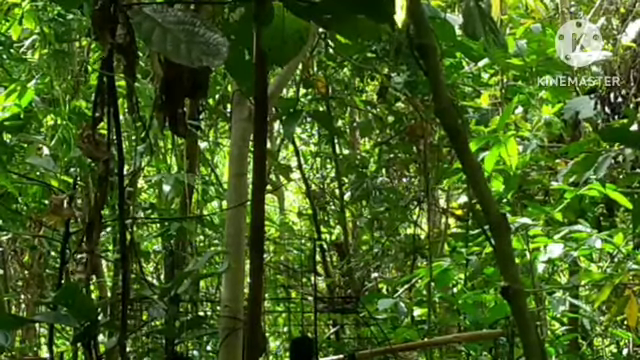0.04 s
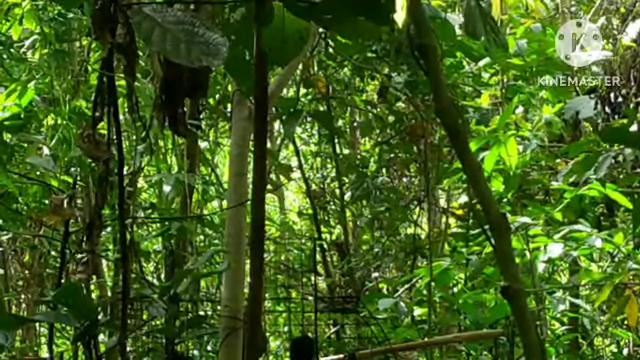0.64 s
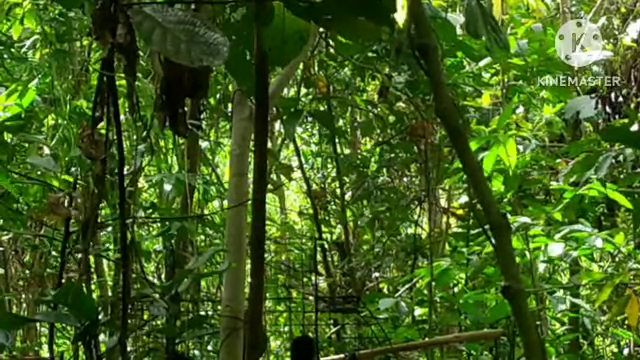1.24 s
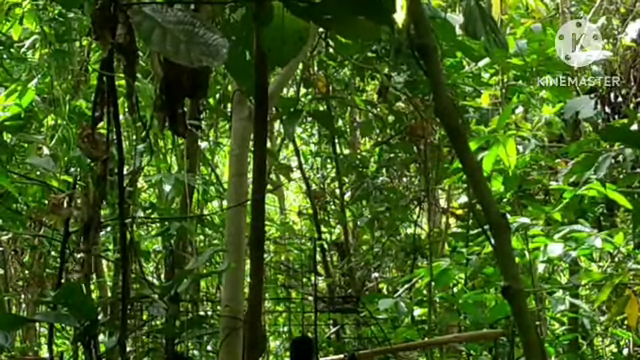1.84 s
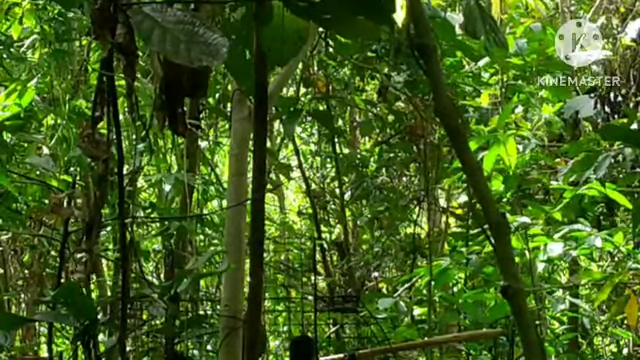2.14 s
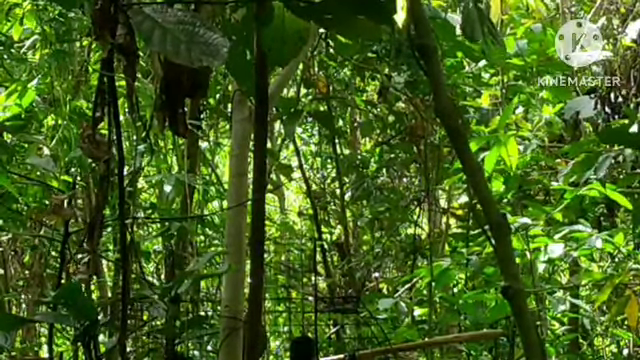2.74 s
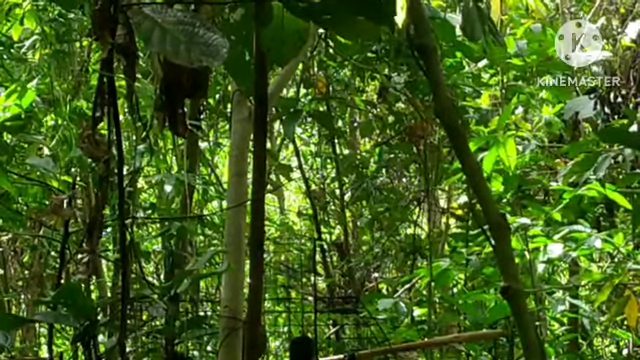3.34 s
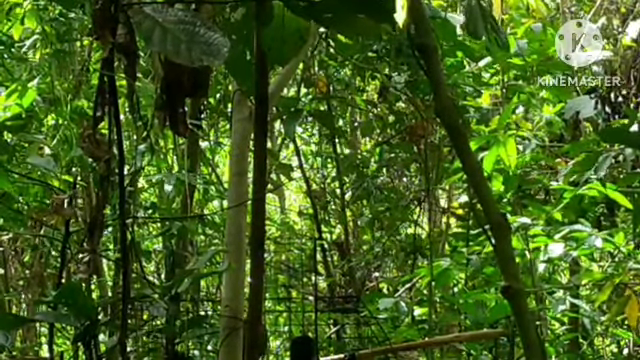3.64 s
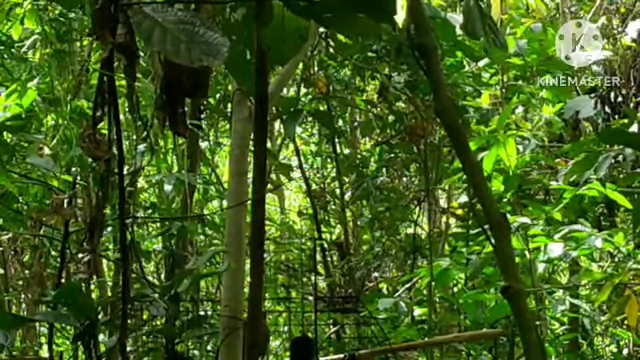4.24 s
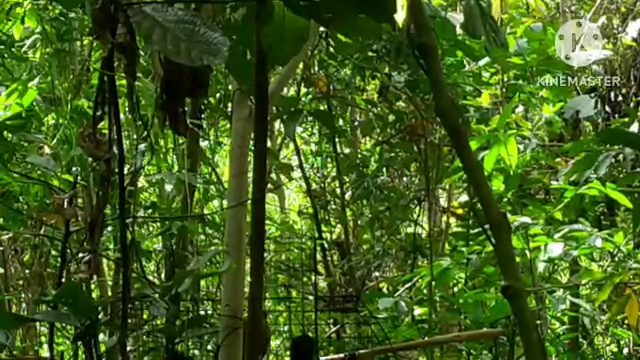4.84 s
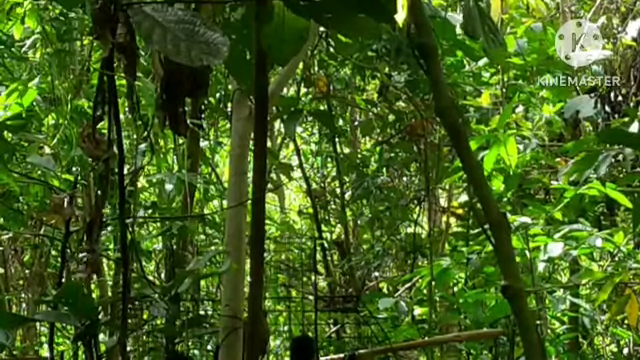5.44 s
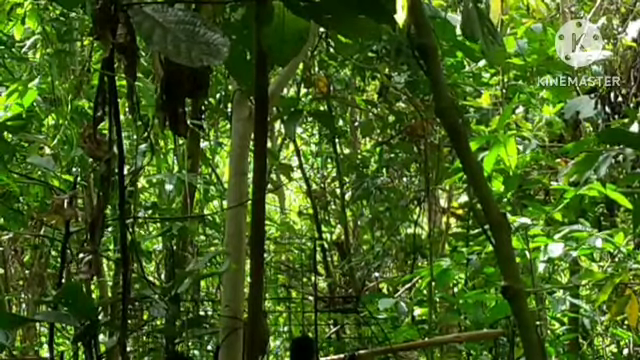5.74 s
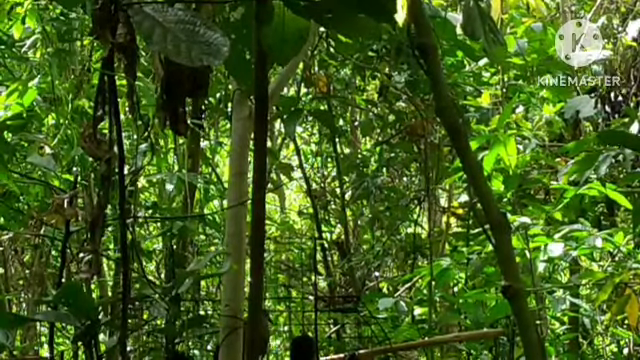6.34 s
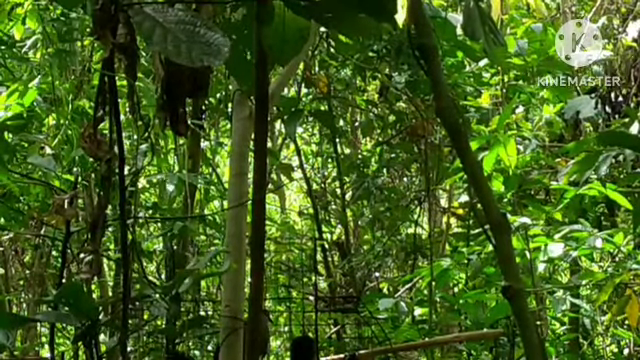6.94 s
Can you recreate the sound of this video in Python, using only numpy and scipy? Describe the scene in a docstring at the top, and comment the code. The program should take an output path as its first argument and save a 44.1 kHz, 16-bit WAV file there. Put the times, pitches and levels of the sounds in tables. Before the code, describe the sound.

A dove hoots in a quickening run in a forest while a small bird ticks sharply over faint insect hiss.

```python
"""A dense forest: a low rumble and a faint insect hiss go on throughout. First leaves rustle and a
far bird whistles. Then a dove starts a quickening run of upward-scooping hoots from its puffed-up
throat, and a small bird joins in on the left with sharp ticks. Faint whistles rise, the dove ends
with five soft hoots, and three hoarse chirps and a last high whistle follow.
Trunks and leaves scatter every call."""
import sys
import numpy as np
from scipy import signal
from scipy.fft import rfft, irfft, next_fast_len
from scipy.io import wavfile
from scipy.ndimage import uniform_filter1d, map_coordinates

SR = 44100
rng = np.random.default_rng(int(sys.argv[2]) if len(sys.argv) > 2 else 0)


def file_out(sig):
    """Save sig as 16-bit WAV at sys.argv[1]."""
    # one column per channel
    cols = np.atleast_2d(sig).T
    # limit, then scale
    lim = np.clip(cols, -1, 1)
    pcm = np.round(lim * 32767).astype(np.int16)
    wavfile.write(sys.argv[1], SR, pcm)


N = 307773


def amp(db):
    """Turn decibels into a number to multiply by."""
    return 10 ** (np.asarray(db) / 20)


def unit(x):
    """Scale a signal to an average strength (rms) of 1."""
    return x / np.sqrt(np.mean(x ** 2) + 1e-20)


def along(points, hz):
    """Read between the rows of a (frequency, value) table, on a log scale."""
    freqs, values = np.transpose(points)
    return np.interp(np.log(hz + 1), np.log(freqs + 1), values)


def wobble(rate, size):
    """A smooth curve through `rate` random values a second."""
    values = rng.standard_normal(int(size * rate / SR) + 4)
    return map_coordinates(values, [np.arange(size) * rate / SR])


def filtered(x, response):
    """Turn each frequency up or down by response(hz)."""
    size = next_fast_len(N + SR // 2)
    return irfft(rfft(x, size) * response(np.fft.rfftfreq(size, 1 / SR)), size)[..., :N]


def add(track, start, sound):
    """Mix a sound into a track, `start` seconds in."""
    part = track[..., max(round(start * SR), 0):][..., :sound.shape[-1]]
    part += sound[..., :part.shape[-1]]


def panned(sound, pan_db):
    """Make stereo, with the left pan_db louder than the right."""
    return sound * amp([[pan_db / 2], [-pan_db / 2]])


# How alike noise is in the two ears: f/Hz, likeness (1 = the same)
EAR_LIKENESS = [(50, 0.4), (150, 0.23), (500, 0.15), (2000, -0.015), (8000, -0.0038)]
def rush(spectrum, patchy_db):
    """Stereo noise with a given tone and random louder and quieter patches."""
    cells = signal.stft(rng.standard_normal((2, N)), nperseg=512)[2]
    patches = uniform_filter1d(rng.standard_normal(cells.shape[1:]), 5, 0)  # smooth over frequency
    patches = uniform_filter1d(patches, 14, 1)  # and over time
    noise = signal.istft(cells * amp(patchy_db * unit(patches)), nperseg=512)[1][:, :N]

    def response(hz):
        spread = np.arccos(np.clip(along(EAR_LIKENESS, hz), -1, 1)) / 2
        return amp(along(spectrum, hz)) * [np.cos(spread), np.sin(spread)]

    mid, side = filtered(noise, response)
    return unit(np.array([mid + side, mid - side]))


# Tone of the air: f/Hz, relative level/dB
AIR_TONE = [(20, -31), (30, -15), (40, -20), (54, 2.5), (70, -3.5), (110, -4), (160, -10), (260, -12.5),
            (500, -16), (800, -19.5), (1700, -21), (2600, -20), (4000, -25), (5200, -41), (8800, -120)]
def air():
    """The air rumbles, low and steady."""
    return panned(amp(-65.5) * rush(AIR_TONE, patchy_db=0.3), pan_db=-1.5)


# Tone of the insects: f/Hz, relative level/dB
INSECT_TONE = [(2350, -22), (4000, -10), (5600, -9.5), (6700, -3), (7400, -8), (8200, -2.5), (9500, -10),
               (12400, -12), (14500, -12.5), (15500, -15)]
# How loud they are: t/s, level/dB
INSECT_LOUDNESS = [(0, -64.5), (2.5, -65.5), (5.3, -62.5), (7, -63)]
def insects():
    """Insects blend into a faint, high hiss."""
    db = np.interp(np.arange(N) / SR, *np.transpose(INSECT_LOUDNESS))
    return panned(amp(db) * rush(INSECT_TONE, patchy_db=4), pan_db=0.5)


# Flicks of the leaves: t/s, level/dB
LEAF_FLICKS = [(0.248, -55), (0.484, -55), (1.074, -60.5)]
# Tone of a rustle: f/Hz, relative level/dB
LEAF_TONE = [(1000, -27), (3000, -13), (6000, -2.5), (9000, -9), (15000, -12)]
def leaves():
    """Flicked leaves give soft bursts of noise that die away quickly."""
    level, t = np.zeros(N), np.arange(SR // 2) / SR
    for start, db in LEAF_FLICKS:
        add(level, start, amp(db - 60 * t / 0.5) * (1 - np.exp(-t / 0.0025)))
    return level * rush(LEAF_TONE, patchy_db=0.5)


def scatter(sound, near_s, far_s, far_db):
    """Echoes fade by 60 dB: in near_s from close leaves, in far_s from distant trees."""
    t = np.arange(SR) / SR
    fade = amp(-60 * t / near_s) + amp(far_db - 60 * t / far_s)
    fade *= 1 - np.exp(-t / 0.0016)
    tail = rng.standard_normal((2, SR)) * fade / np.linalg.norm(fade)
    return signal.fftconvolve(sound[None], tail, axes=1)


def glide(length, hz, slide):
    """A pitch that slides evenly through hz; a slide of 0.1 rises about a tenth."""
    return hz * np.exp(slide * np.linspace(-0.5, 0.5, round(length * SR)))


def bird_note(pitch, rough, far_s, far_db):
    """A rounded note with a shaky pitch, heard mostly through the trees."""
    swell = np.sqrt(np.abs(np.sin(np.linspace(0, np.pi, len(pitch)))))
    shaky_pitch = pitch * (1 + rough * wobble(669, len(pitch)))
    note = swell * np.sin(2 * np.pi * np.cumsum(shaky_pitch) / SR)
    out = scatter(note, 0.023, far_s, far_db) * amp([[9], [7]])
    add(out, 0, note * amp([[1], [-2]]))
    return out


# High whistles: t/s, length/s, middle f/Hz, slide (below 0 falls), level/dB
HIGH_WHISTLES = [(0.53, 0.083, 7440, -0.22, -58), (1.541, 0.083, 8300, -0.082, -52.5),
                 (1.974, .04, 7000, -0.15, -58), (6.91, 0.078, 8960, .2, -48)]
def high_whistles():
    """Far birds give short, thin whistles, rougher the more they slide."""
    out = np.zeros((2, N))
    for start, length, hz, slide, db in HIGH_WHISTLES:
        note = bird_note(glide(length, hz, slide), rough=0.249 * abs(slide), far_s=0.38, far_db=-7.5)
        add(out, start, amp(db) * note)
    return out


def hoot(length, top_hz, climb, scoop, swell_db, fullest, flick, push_db, sag, release_s,
         octave_db, husk_db):
    """One nearly pure dove note: a quick scoop up, a swelling climb, a last push, then a drop."""
    throat_hz, throat_width_hz = 603, 386
    t = np.arange(SR // 5) / SR
    progress = np.clip(t / length, 0, 1)  # the swell peaks when this reaches `fullest`
    ending = np.clip((t - length) / release_s, 0, 1)
    closing = np.exp(-((t - length) / 0.011) ** 2)
    # scoop, climb, flick and sag are shares of the top pitch
    rise = 1 - scoop * np.exp(-t / 0.0166) - climb * (1 - progress) ** 2.29
    tune = rise + flick * closing - sag * ending ** 2
    pitch = top_hz * tune * (1 + 0.01 * wobble(151.2, len(t)))
    phase = 2 * np.pi * np.cumsum(pitch) / SR
    gate = np.clip(t / 0.0095, 0, 1) * (1 - ending ** 2)
    # louder near the pitch at which the puffed-up throat rings
    bloom = 1 / np.hypot(1, 2 * (pitch - throat_hz) / throat_width_hz)
    level = amp(push_db * closing - swell_db * (progress - fullest) ** 2) * gate * bloom
    # a little husky, most of all as the throat closes
    husk = amp(husk_db) * (gate + 4 * closing) * wobble(329, len(t))
    overtone = amp(octave_db) * bloom * np.sin(2 * phase)
    return np.sqrt(2) * (level * (np.sin(phase) + overtone) + husk * np.cos(phase))


# The dove's run of hoots: t/s, length/s, level/dB
HOOT_RUN = [(1.341, 0.077, -46.5), (1.789, 0.095, -45.5), (2.076, .112, -41.5), (2.407, .12, -40.5),
            (2.72, 0.11, -40), (3.019, 0.11, -39), (3.287, 0.11, -40), (3.536, 0.1, -39.5),
            (3.765, .09, -38.5), (3.971, .087, -39.5), (4.166, 0.08, -40), (4.348, 0.069, -40),
            (4.512, .069, -40.5), (4.679, .063, -39.5)]
def full_hoots():
    """The dove's main run slowly sinks in pitch; its first notes are steeper and brighter."""
    direct, ring = np.zeros((2, N)), np.zeros((2, N))
    for start, length, db in HOOT_RUN:
        elapsed = start - HOOT_RUN[0][0]
        opening = np.exp(-(elapsed / 0.715) ** 4)  # 1 at first, 0 once the voice has settled
        top_hz = 578.4 - 6.3 * elapsed + 17.4 * opening
        note = amp(db) * hoot(length, top_hz, climb=0.0837 + 0.151 * opening, scoop=0.205,
                              swell_db=25, fullest=0.76, flick=0.044, push_db=1.55, sag=0.28,
                              release_s=0.0156, octave_db=-24.5 + 5.5 * opening, husk_db=-28)
        add(direct, start, panned(note, pan_db=1))
        add(ring, start, scatter(note, near_s=0.2, far_s=0.66, far_db=-2))
    return direct + dove_echoes(direct, ring)


# Bounces off tree trunks: delay t/s, left level/dB, right level/dB
TRUNK_BOUNCES = [(.014, -37, -26.5), (.048, -25.5, -10.5), (.106, -18.5, -15), (.232, -31, -30)]
# Tone of the dove's echoes: f/Hz, level change/dB
ECHO_TONE = [(400, -12), (530, -6), (610, 3.5), (700, 3.5), (1100, -8.5)]
def dove_echoes(direct, ring):
    """Trunks throw the hoots back over the forest's ring, strongest near the top of each note."""
    echoes = amp(-3) * ring
    for delay, left_db, right_db in TRUNK_BOUNCES:
        add(echoes, delay, direct * amp([[left_db], [right_db]]))
    return filtered(echoes, lambda hz: amp(along(ECHO_TONE, hz)))


# The small bird's ticks: t/s, level/dB, extra level/dB for the direct sound only
BIRD_TICKS = [(2.0293, -41, -2.5), (2.312, -42.5, 0.5), (2.664, -43, -13), (3.0306, -43, -20),
              (3.598, -42, -3.5), (4.013, -46, 0.5), (4.418, -46, -10), (4.7744, -46, -5), (5.234, -47, -8),
              (5.7217, -46, -9), (6.188, -45, -14), (6.5547, -44.5, -7)]
# Tone of the ticks: f/Hz, level change/dB
TICK_TONE = [(2500, 2.5), (4300, -10.5), (6000, -2), (9000, 3.5), (10500, -1.5), (12300, -11), (14500, -9)]
def ticks():
    """Each tick is a whistle that plunges within milliseconds and is smeared by the leaves."""
    out, t = np.zeros((2, N)), np.arange(SR // 60) / SR
    level = amp(np.interp(t, [0, 0.0016, 0.005, 0.008, 0.016], [1.5, 1, -6, -12.5, -35]))
    level *= np.clip(t / 0.0008, 0, 1)
    plunge = 0.15 + 0.95 * np.exp(-t / 0.0072)
    for start, db, direct_db in BIRD_TICKS:
        elapsed = start - BIRD_TICKS[0][0]
        pitch = (8460 - 145 * elapsed) * plunge  # each tick is a little lower
        phase = 2 * np.pi * np.cumsum(pitch) / SR
        overtone = amp(-4) * np.sin(2 * phase) * (pitch < SR / 4)
        tick = amp(db) * level * (np.sin(phase) + overtone)
        add(out, start, panned(amp(direct_db) * tick, pan_db=13))
        add(out, start, scatter(tick, near_s=0.035, far_s=0.51, far_db=2.5) * amp([[11.5], [4.5]]))
    return filtered(out, lambda hz: amp(along(TICK_TONE, hz)))


# Rising whistles: t/s, length/s, middle f/Hz, level/dB
RISING_WHISTLES = [(3.14, .17, 4720, -73), (4.858, .26, 4100, -76.5)]
def rising_whistles():
    """A faint bird slides slowly upward."""
    out = np.zeros((2, N))
    for start, length, hz, db in RISING_WHISTLES:
        note = bird_note(glide(length, hz, slide=0.5), rough=0.037, far_s=0.64, far_db=-14)
        add(out, start, amp(db) * note)
    return out


# Starts of the dove's soft hoots: t/s
SOFT_STARTS = [5.017, 5.29, 5.546, 5.804, 6.052]
def soft_hoots():
    """The dove ends with five quiet, purer notes, each a little lower."""
    direct, ring = np.zeros((2, N)), np.zeros((2, N))
    for start in SOFT_STARTS:
        elapsed = start - SOFT_STARTS[0]
        note = amp(-55) * hoot(length=0.0904, top_hz=570.8 - 14 * elapsed, climb=0.084, scoop=0.165,
                               swell_db=23, fullest=0.98, flick=0.01, push_db=2, sag=0.057,
                               release_s=0.028, octave_db=-47, husk_db=-52)
        add(direct, start, panned(note, pan_db=-13 + 10 * elapsed))  # from the right toward the middle
        add(ring, start, scatter(note, near_s=0.3, far_s=0.69, far_db=2))
    return direct + dove_echoes(direct, ring)


# Hoarse chirps: t/s, top f/Hz, level/dB
HOARSE_CHIRPS = [(6.018, 2950, -68.5), (6.279, 3275, -58.5), (6.552, 3190, -57.5)]
def chirps():
    """A far bird chirps hoarsely; each note arches up, then drops."""
    out, t = np.zeros((2, N)), np.arange(round(0.081 * SR)) / SR
    drop, peak_s, width_s = 0.28, 0.024, 0.023
    arch = 1 - drop * (1 - np.exp(-((t - peak_s) / width_s) ** 2))
    for start, hz, db in HOARSE_CHIRPS:
        add(out, start, amp(db) * bird_note(hz * arch, rough=0.086, far_s=0.75, far_db=-17))
    return out


def scene():
    """All the forest's sounds, in the order they begin."""
    return (air() + insects() + leaves() + high_whistles() + full_hoots() + ticks()
            + rising_whistles() + soft_hoots() + chirps())


def record(dry):
    """Cut off the very highest treble."""
    return filtered(dry, lambda hz: hz < 15600)


dry = scene()
out = record(dry)
file_out(out)
```